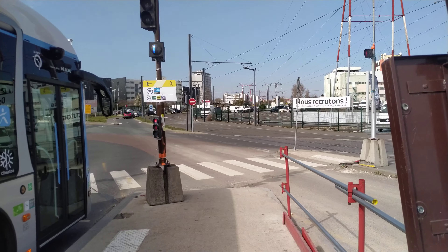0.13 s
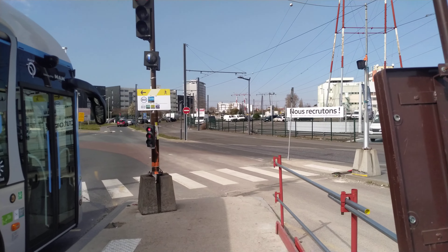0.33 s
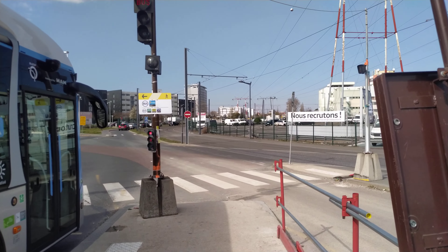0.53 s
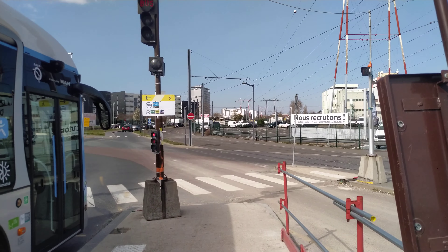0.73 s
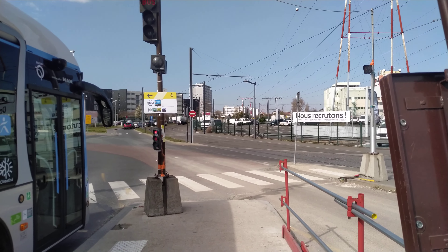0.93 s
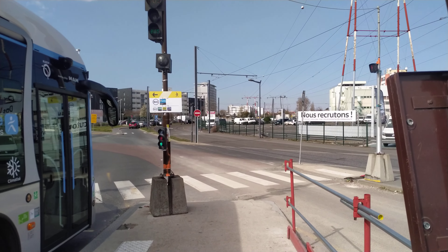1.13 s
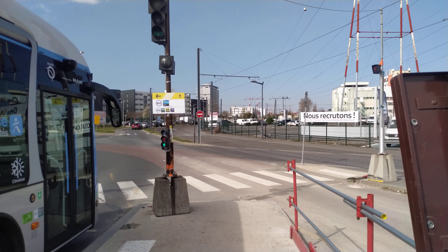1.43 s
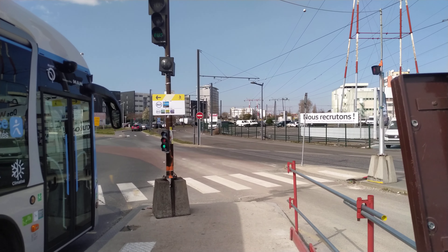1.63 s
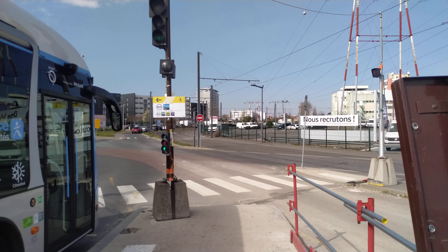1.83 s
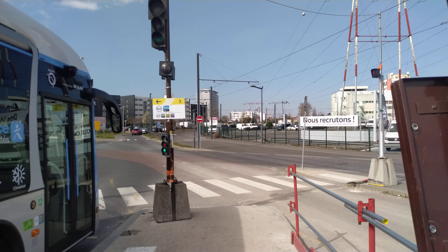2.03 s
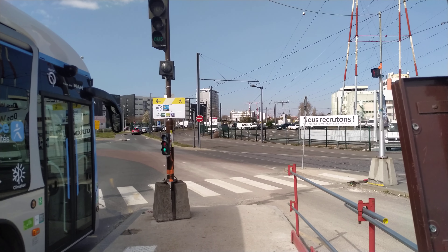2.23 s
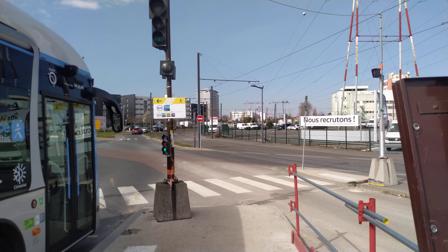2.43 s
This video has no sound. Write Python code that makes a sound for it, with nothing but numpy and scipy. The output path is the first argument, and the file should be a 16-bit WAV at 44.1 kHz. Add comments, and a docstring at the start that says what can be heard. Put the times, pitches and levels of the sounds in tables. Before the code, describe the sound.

A city bus idles close by, mostly on the left, with a low uneven throb and wavering fan drone. Thin ringing air hiss, two short brake puffs, then a loud air blast at the end; faint traffic behind.

```python
"""A city bus idles at a junction, mostly stronger on the left: firings throb under a wavering fan drone.
The throb is filtered firing pulses plus a sine; rumble and clatter are coloured noise, the drone is sines.
Air is filtered noise: a thin, ringing hiss, two short brake-valve puffs, then a third running into a loud
blast that lasts to the end. A small snap and distant traffic join in.
Road and bodywork reflect the air noise and clatter; the whole scene fades in at the start."""
import sys
import numpy as np
from scipy import signal
from scipy.fft import rfft, irfft
from scipy.io import wavfile

SR = 44100
rng = np.random.default_rng(int(sys.argv[2]) if len(sys.argv) > 2 else 0)


def log_audio(samples):
    """Write samples as a 16-bit WAV file to the path given in sys.argv[1]."""
    # one column per channel
    frames = np.atleast_2d(samples).T
    # limit to full scale, then quantise
    limited = np.clip(frames, -1, 1)
    pcm = np.round(limited * 32767).astype(np.int16)
    wavfile.write(sys.argv[1], SR, pcm)


N = 113337
TIME = np.arange(N) / SR  # s
FREQS = np.fft.rfftfreq(N, 1 / SR)  # Hz


def undb(db):
    """Decibels to gain."""
    return 10 ** (np.asarray(db) / 20)


def level(x, db):
    """Set the rms level, over all channels together."""
    return x * undb(db) / np.sqrt(np.mean(x ** 2))


def ride(points):
    """Gain over time from (time [s], level [dB]) points, like a moving fader."""
    seconds, db = np.array(points).T
    return undb(np.interp(TIME, seconds, db))


def curve(points):
    """Gain at every frequency from (frequency [Hz], gain [dB]) points, joined on a log axis."""
    hz, db = np.array(points, float).T
    return undb(np.interp(np.log(FREQS + 1e-9), np.log(hz), db))


def colour(x, points, rings=()):
    """Filter by a broad colour with narrow resonances standing on it."""
    power_lift = 1
    for hz, width, db in rings:
        power_lift = power_lift + (undb(db) ** 2 - 1) / (1 + (2 * (FREQS - hz) / width) ** 2)
    return irfft(rfft(x) * curve(points) * np.sqrt(np.abs(power_lift)), N)


def noise():
    """White noise."""
    return rng.standard_normal(N)


def walk(rate_hz):
    """Smooth random drift with spread 1: noise kept mostly below the given rate."""
    lowpass = np.exp(-(FREQS / rate_hz) ** 2) * (FREQS > 0)
    return level(irfft(rfft(noise()) * lowpass, N), 0)


def ports(x, side, lag, scattered=0):
    """Two microphones: the direct sound, later on the left, plus scattered sound that differs on each."""
    delay_s = np.array([[lag], [0]])
    direct = rfft(x) * np.exp(-2j * np.pi * FREQS * delay_s)
    scattered = rfft(scattered + np.zeros((2, N)))
    balance = curve(side) ** np.array([[.5], [-.5]])  # half the difference on each channel
    return irfft((direct + scattered) * balance, N)


def reflect(heard):
    """Reflections off road and bodywork, a short decaying noise echo, ripple the spectrum."""
    reflection_db, decay_s = -4, .014
    echoes = rng.standard_normal((2, N)) * np.exp(-TIME / decay_s)
    echoes /= np.sqrt(np.sum(echoes ** 2, axis=1, keepdims=True))
    return irfft(rfft(heard) * (1 + undb(reflection_db) * rfft(echoes)), N)


def spread(points, rings, side, echo_db):
    """Coloured turbulence at unit level, heard directly, scattered (echo_db against direct) and reflected."""
    port_lag_s = 0.000362
    direct, left, right = (colour(noise(), points, rings) for _ in range(3))
    scattered = undb(echo_db) * np.array([left, right])
    return level(reflect(ports(direct, side, port_lag_s, scattered)), 0)


def engine():
    """Uneven firings throb in the exhaust; the block rumbles and clatters, and the fan drones."""
    firing_hz, speed_wander = 26.2, 0.0099  # mean rate; spread as a share of it
    # left minus right for the whole engine: (frequency [Hz], difference [dB])
    engine_side = [(30, 1.6), (500, 1.6), (1200, 2), (2200, 6), (4000, 3)]
    cycles = np.cumsum(firing_hz * (1 + speed_wander * walk(2.97))) / SR
    beat = np.sin(2 * np.pi * cycles)
    size = firing_sizes(cycles)
    low = throb(cycles, beat, size) + rumble() + drone()
    bass_lag_s = 0.00019
    return ports(low, engine_side, bass_lag_s) + clatter(beat, size, engine_side)


def firing_sizes(cycles):
    """Each firing has its own strength: a pattern over one shaft turn plus random scatter."""
    scatter_db = 4
    # the three firings of one shaft turn, before scatter: (level [dB])
    cylinders_db = [-6.5, -5, -5]
    index = cycles.astype(int)
    return undb(np.take(cylinders_db, index, mode="wrap") + scatter_db * noise()[index])


def throb(cycles, beat, size):
    """Each firing is a sudden pressure that decays; the exhaust colours it, over a sine at the firing rate."""
    beat_db, exhaust_db = -26, -33  # before the level ride
    pulse_width = 0.11  # decay, as a share of a firing cycle
    # exhaust colour: (frequency [Hz], gain [dB])
    exhaust_colour = [(15, -25), (32, -7), (42, -1), (52, 2), (68, -2.5), (100, -5), (135, -20.5),
                      (200, -9), (300, -40), (600, -61)]
    # slow level ride of the throb: (time [s], level [dB])
    throb_ride = [(.15, -2), (.35, -1.5), (.7, 1.5), (1.1, 0.5), (1.45, 3.5), (2.0, 1), (2.5, 3.5)]
    pulses = size * np.exp(-(cycles % 1) / pulse_width)
    exhaust = level(colour(pulses - pulses.mean(), exhaust_colour), exhaust_db)
    return (level(beat, beat_db) + exhaust) * ride(throb_ride)


def rumble():
    """The block shakes irregularly: low coloured noise under a level ride."""
    # rumble colour: (frequency [Hz], gain [dB])
    rumble_colour = [(12, -7), (25, -21), (40, 2), (58, -5.5), (80, -4.5), (105, -4.5), (135, -12.5),
                     (170, -11.5), (240, -13), (290, -18.5), (400, -20.5), (600, -31), (1200, -63)]
    # level ride of the rumble: (time [s], level [dB])
    rumble_ride = [(.38, -2), (.48, 2), (.65, 1), (.78, -1), (.97, 2), (1.25, -0.5), (1.65, 0.5),
                   (2.1, -0.5), (2.5, 0.5)]
    return level(colour(noise(), rumble_colour), -31) * ride(rumble_ride)


def drone():
    """Fan and ancillaries hum: sines that wander in pitch and flutter in level."""
    flutter_db, flutter_hz = 2.1, 17
    # drone tones: (frequency [Hz], rms level [dB], pitch wander [share])
    drone_tones = [(68.1, -40, 0.0044), (91, -39.5, 0.011), (100, -41.5, 0.0083), (175.6, -53.5, 0.0052),
                   (203.2, -49.5, 0.0072), (223.7, -40.5, 0.0049), (557.6, -57, 0.0087),
                   (771, -52.5, 0.011), (961.5, -56.5, 0.0076)]
    hum = 0
    for hz, db, wander in drone_tones:
        tone = np.sin(2 * np.pi * np.cumsum(hz * (1 + wander * walk(8.06))) / SR)
        hum = hum + level(tone * undb(flutter_db * walk(flutter_hz)), db)
    return hum


def clatter(beat, size, side):
    """Mechanical noise from the block, pulsing at the firing rate, deeper on stronger firings."""
    clatter_db, waver_db, echo_db = -42.5, .8, -6  # level before the pulsing; drift; scattered sound
    # clatter colour: (frequency [Hz], gain [dB])
    clatter_colour = [(150, -36), (330, 3.5), (480, -8), (610, -0.5), (800, 1.5), (1050, -0.5),
                      (1400, -2.5), (2300, -6), (3300, -12.5), (4500, -17.5), (9000, -70)]
    pulsing = 1 + 0.25 * beat * size / 2
    knock = pulsing * undb(clatter_db + waver_db * walk(6.7))
    return knock * spread(clatter_colour, (), side, echo_db)


def jet(points, rings=()):
    """Turbulent air from the valve outlet, as it reaches the microphones, at unit level."""
    # left minus right for the valve air: (frequency [Hz], difference [dB])
    air_side = [(600, 1), (1500, 3), (2300, 6.5), (3100, 4), (4000, 6), (5800, 2), (6800, 3.5), (8500, 8),
                (10000, 4), (11800, 0), (14000, -1)]
    air = spread(points, rings, air_side, 2.5)
    no_bass = signal.butter(3, 630, "high", fs=SR, output="sos")
    return level(signal.sosfilt(no_bass, air), 0)


def blast():
    """The valve opens wide: the jet swells, then sags as pressure drops; its roar builds after the hiss."""
    start_s, attack_s = 2.352, .019
    blast_db, swell_db, swell_s, sag_db_per_s = -19.5, 0.5, 0.08, 20  # level at the top of the swell
    roar_hz, roar_attack_s = 4500, .026
    # blast colour: (frequency [Hz], gain [dB])
    air_colour = [(600, -13), (1000, -7), (1350, -12.5), (1600, -9.5), (1800, -14), (2020, -6.5),
                  (2500, -6), (2900, -3.5), (3500, -6), (4200, -6), (4900, -8.5), (5900, -5), (6700, -3),
                  (8500, -1.5), (9400, -4.5), (9900, -9), (11400, -11.5), (12200, -10), (14000, -15)]
    # resonances of the valve outlet: (frequency [Hz], width [Hz], lift [dB])
    air_rings = [(2100, 50, 7), (2220, 120, 3), (2910, 40, 3), (3856, 45, 9), (4030, 35, 7), (4380, 100, 4),
                 (6640, 35, 7), (6703, 35, 7), (6834, 50, 7), (8290, 50, 8), (8770, 30, 5)]
    age = TIME - start_s
    swell = swell_db * np.clip(1 - age / swell_s, 0, 1)
    sag = sag_db_per_s * np.maximum(age - swell_s, 0)
    grain = 0.51 * walk(190)  # dB
    flow = np.clip(age / attack_s, 0, 1) * undb(blast_db - swell - sag + grain)
    air = jet(air_colour, air_rings)
    roar = irfft(rfft(air) / (1 + (FREQS / roar_hz) ** 4), N)
    missing_roar = roar * np.exp(-np.maximum(age, 0) / roar_attack_s)
    return flow * (air - missing_roar)


def puffs():
    """The brake valve opens briefly: attack, a sagging hold, release."""
    attack_s, sag_db_per_s, grain_db = 0.015, 25, 1.5
    # puff colour: (frequency [Hz], gain [dB])
    puff_colour = [(400, -23), (1100, 5.5), (2200, 5), (3800, 3), (5000, -2.5), (6800, 5.5), (8500, 3),
                   (10000, 1), (12500, -2), (14200, 0.5)]
    # puffs, the last just ahead of the blast: (start [s], length [s], level before sag [dB], release [s])
    puff_times = [(0.327, 0.058, -33.5, 0.028), (1.183, 0.055, -33.5, 0.017), (2.322, 0.038, -36.5, 0.02)]
    flow = 0
    for start, length, db, release in puff_times:
        age = np.maximum(TIME - start, 0)
        attack = np.minimum(age / attack_s, 1)
        closing = np.exp(-np.maximum(age - length, 0) / release)
        flow = flow + attack * closing * undb(db - sag_db_per_s * age)
    return flow * undb(grain_db * walk(180)) * jet(puff_colour)


def leak():
    """A thin hiss of air; its narrow resonances swell and fade, each on its own."""
    leak_db, waver_db = -45, 0.72  # broad hiss before the level ride; its quick waver
    swell_db, swell_hz = 1.8, 2.5  # of each resonance
    # broad hiss colour: (frequency [Hz], gain [dB])
    leak_colour = [(3000, -11), (4700, -14.5), (6000, -10), (6700, -6), (7200, -1), (8400, -2.5),
                   (9100, -9.5), (10000, -13.5), (10900, -21.5), (11900, -15.5), (13200, -16.5),
                   (14500, -23)]
    # narrow resonances added to it: (frequency [Hz], width [Hz], gain before swell [dB])
    leak_rings = [(5060, 55, 9), (5330, 22, 9), (5715, 40, 4), (6080, 40, 5.5), (6290, 25, 5),
                  (7015, 25, 10), (7165, 35, 10.5), (7580, 22, 9.5), (7665, 45, 7), (7975, 25, 6),
                  (8135, 50, 5), (8455, 55, 9), (8750, 20, 10), (9390, 25, 7)]
    # left minus right: (frequency [Hz], difference [dB])
    leak_side = [(4000, 2), (6800, 1.5), (7300, 4.5), (8500, 8), (10000, 2), (11500, 0), (14000, 0)]
    # level ride of the hiss: (time [s], level [dB])
    leak_ride = [(.12, -2.5), (.3, -1), (.62, -0.5), (.82, 1.5), (1.05, 2), (1.3, 1), (1.55, 1), (1.9, 2),
                 (2.15, 4), (2.3, 2)]
    hiss, drive = (spread(leak_colour, (), leak_side, 2) for _ in range(2))
    drive = rfft(drive)
    for hz, width, db in leak_rings:
        ring = irfft(drive / (1 + 2j * (FREQS - hz) / width), N)
        hiss = hiss + ring * undb(db + swell_db * walk(swell_hz))
    return hiss * ride(leak_ride) * undb(leak_db + waver_db * walk(19))


def tick():
    """One small, sharp snap in a few quickly damped modes, stronger on the left."""
    start_s = 1.1172
    # modes of the snap: (frequency [Hz], envelope peak before panning [dB], decay [s])
    tick_modes = [(2200, -35, .0004), (3320, -29, .0004), (4100, -42, .0003)]
    age = np.maximum(TIME - start_s, 0)
    snap = 0
    for hz, db, decay in tick_modes:
        envelope = age / decay * np.exp(1 - age / decay)
        snap = snap + undb(db) * np.sin(2 * np.pi * hz * age) * envelope
    return snap * undb([[1.5], [-1.5]])


def street():
    """Distant traffic from all sides: separate coloured noise on each channel, swelling together."""
    street_db, swell_db = -46.5, .4
    # traffic colour: (frequency [Hz], gain [dB])
    street_colour = [(100, -16), (400, -7), (800, 6.5), (1200, -7.5), (1700, -10.5), (2800, -15),
                     (4500, -21.5), (10000, -43), (14000, -46)]
    traffic = np.array([colour(noise(), street_colour) for _ in range(2)])
    return level(traffic, street_db) * undb(swell_db * walk(2.9))


def scene():
    """The bus and its air system against the street."""
    return engine() + blast() + puffs() + leak() + tick() + street()


def record(dry):
    """The phone fades in, holds the last fade gain and cuts the top with a steep low-pass."""
    top_hz = 14050
    # opening fade: (time [s], level [dB])
    fade = [(.074, -81), (.08, -26), (.11, -14.5), (.18, -10.5), (.26, -6), (.36, -4.5)]
    cut = signal.ellip(10, .2, 80, top_hz, fs=SR, output="sos")
    return signal.sosfilt(cut, dry * ride(fade))


dry = scene()
out = record(dry)
log_audio(out)
```